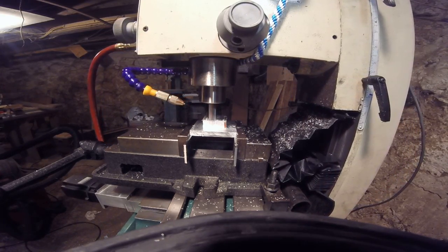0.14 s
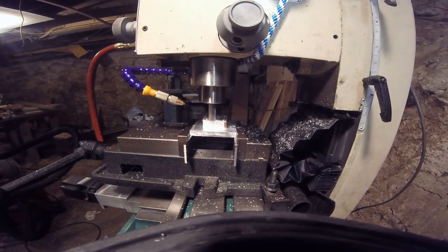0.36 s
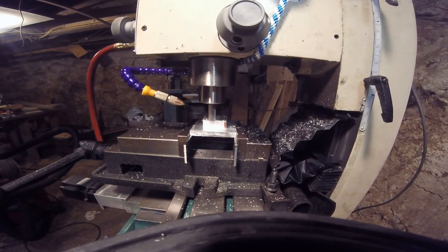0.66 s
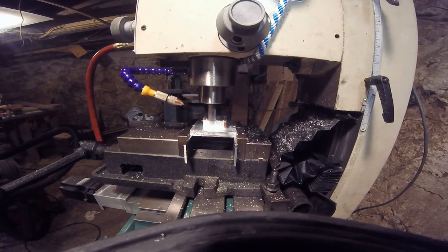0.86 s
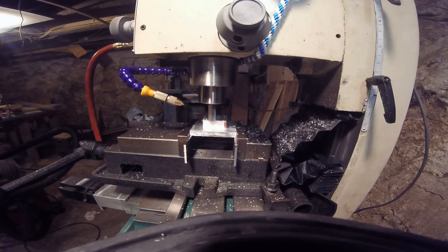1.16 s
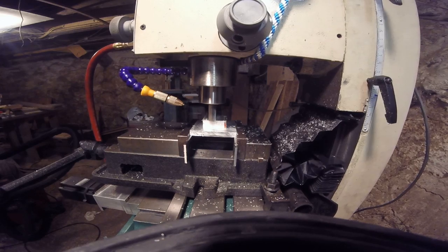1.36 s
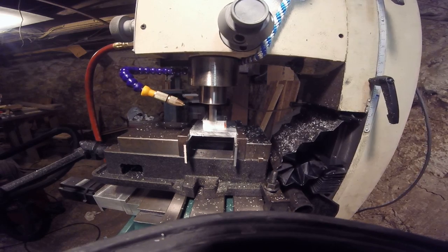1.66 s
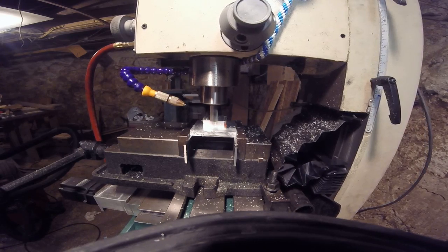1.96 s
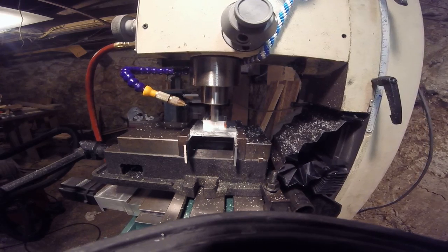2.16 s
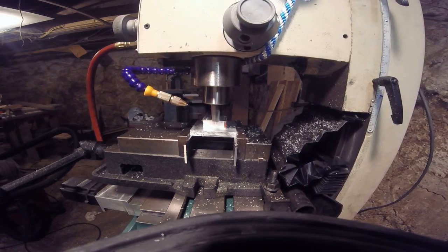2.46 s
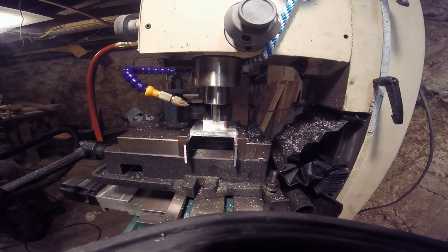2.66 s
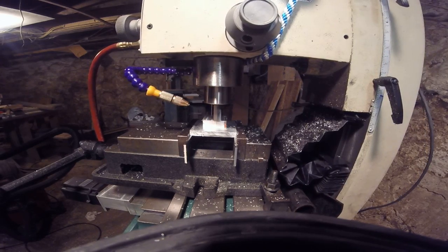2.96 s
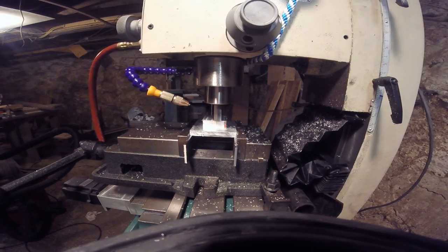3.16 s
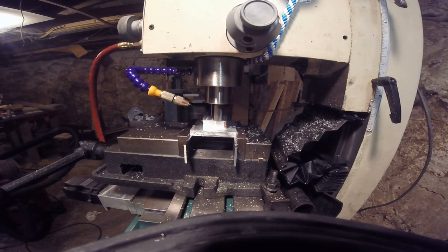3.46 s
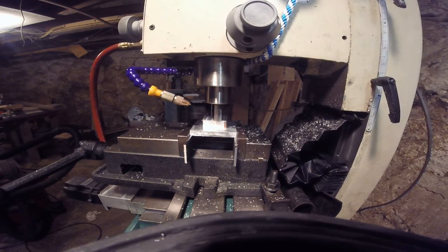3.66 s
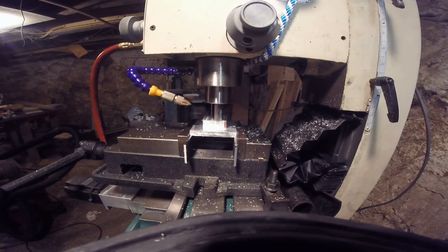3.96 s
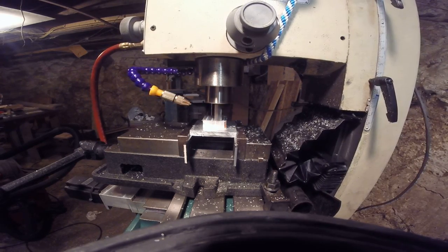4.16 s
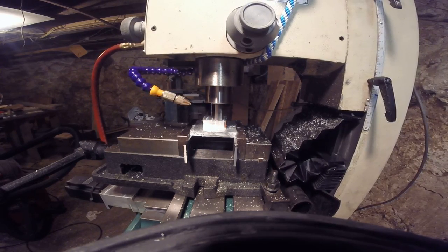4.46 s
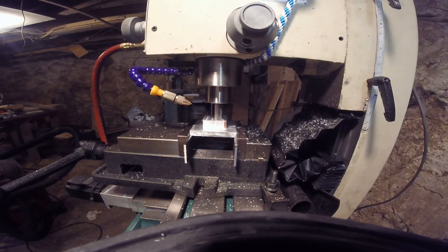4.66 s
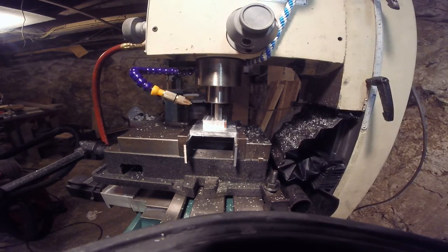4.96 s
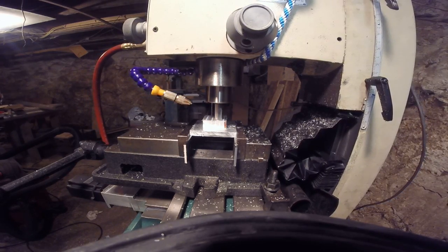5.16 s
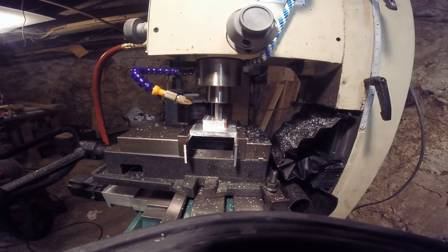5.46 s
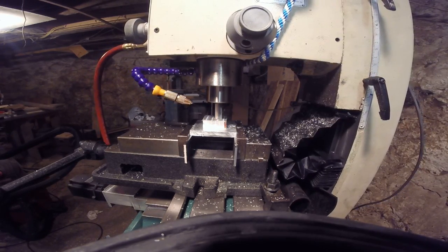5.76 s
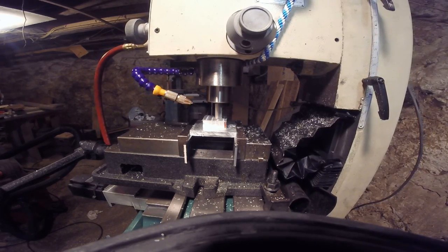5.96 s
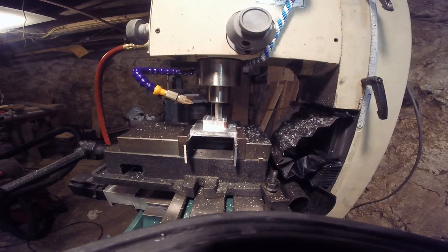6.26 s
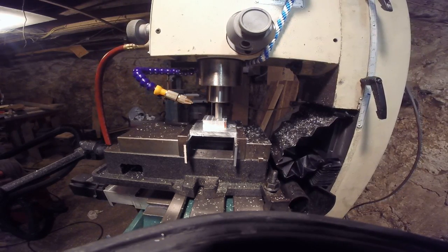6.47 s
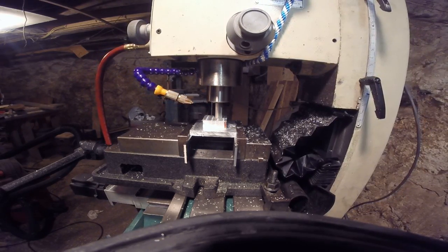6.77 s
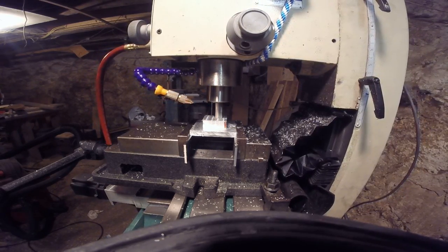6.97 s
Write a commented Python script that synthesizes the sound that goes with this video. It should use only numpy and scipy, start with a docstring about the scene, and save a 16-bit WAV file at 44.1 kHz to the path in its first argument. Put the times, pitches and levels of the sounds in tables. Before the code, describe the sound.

A small milling machine hums and hisses steadily as its cutter leaves the metal, the feed note sinks and rises, then cutting resumes.

```python
"""A small milling machine cuts metal, heard from a microphone near its table. Belt-driven spindle orders, motor knocks,
rumble and the air-jet hiss in ringing sheet-metal guards run throughout. The four-flute end mill leaves the block by
0.8 s; from 1 s the feed motors swing the table round a half circle, their note gliding to a halt at 2.3 s and back,
with jolts at its start, reversal and end. The cutter bites again from 2.5 s, at nearly full depth by 3.3 s.
Sources: sines locked to rotation, impulses through resonances, and coloured noise."""
import sys
import numpy as np
from scipy import signal
from scipy.fft import rfft, irfft, next_fast_len
from scipy.io import wavfile
from scipy.ndimage import uniform_filter1d, map_coordinates

SR = 44100
rng = np.random.default_rng(int(sys.argv[2]) if len(sys.argv) > 2 else 0)


def amplitude_ratio(level_db):
    """Convert a level in decibels to the matching linear amplitude (field) ratio."""
    exponent = np.asarray(level_db, float) / 20
    return 10 ** exponent


def pcm_store(signal):
    """Save signal as 16-bit PCM."""
    levels = np.round(np.clip(np.atleast_2d(signal), -1, 1) * 32767)
    wavfile.write(sys.argv[1], SR, levels.astype(np.int16).T)


N = 313992
BELT_RATIO = 1.79  # motor turns per spindle turn

# Spindle load. Each row: time in seconds, unbalance level in dB, depth of cut in dB re a full cut.
SPINDLE_LOAD = [(0, -28, 2), (.3, -24, 1), (.6, -24, -4), (.8, -27, -28), (1, -28.5, -36),
                (1.5, -30.5, -42), (2, -31.5, -49), (2.45, -32, -28), (2.65, -31, -16), (2.95, -31.5, -10),
                (3.15, -30.5, -2.5), (3.3, -31, -1), (3.6, -31, 0), (3.85, -25.5, 0), (5, -27.5, 0.5),
                (6, -25, -.5), (7.12, -26.5, -0.4)]
# Spindle speed. Each row: time in seconds, turns per second.
SPINDLE_SPEED = [(0, 34.35), (.5, 34.2), (1.5, 33.74), (2, 33.7), (3, 33.4), (4.25, 33.83), (5, 33.95),
                 (7.12, 34.09)]
# Head travel. Each row: time in seconds, share of the second side (0 to 1).
HEAD_TRAVEL = [(0, 0.054), (1.5, 0.23), (2.5, 0.29), (4, 0.27), (5.5, 0.87), (7.12, 1)]
# Half circle of the table: middle in seconds, half length in seconds.
HALF_CIRCLE = (2.28, 1.24)
# Frame and table resonances. Each row: centre in Hz, width in Hz, gain in dB.
FRAME_MODES = [(70.4, 12, 10), (93.2, 28.5, 12.5), (130, 22, 4.5), (167.5, 18, 9.5), (381.7, 22.5, 5.5)]


def unit(x):
    """Scaled to rms 1."""
    return x / np.sqrt(np.mean(x ** 2) + 1e-20)


def seconds():
    """Time of each sample."""
    return np.arange(N) / SR


def curves(rows):
    """One value per sample for each column after the time."""
    s, *cols = np.transpose(rows)
    return [np.interp(seconds(), s, c) for c in cols]


def wobble(rate_hz):
    """Smooth random curve, rate_hz knots a second."""
    knots = rng.standard_normal(int(N * rate_hz / SR) + 4)
    return map_coordinates(knots, [np.arange(N) * rate_hz / SR])


def filtered(x, response):
    """x times a response of frequency."""
    m = next_fast_len(N + SR // 2)
    return irfft(rfft(x, m) * response(np.fft.rfftfreq(m, 1 / SR)), m)[:N]


def resonance(f, hz, width_hz):
    """Causal band-pass response, 1 at its centre."""
    return 1j * f * width_hz / (hz * hz - f * f + 1j * f * width_hz)


def noise(response, patchy_db):
    """Noise of rms 1 with time-frequency patches of random gain, coloured by a response."""
    z = signal.stft(rng.standard_normal(N + 512), nperseg=512)[2]
    field = uniform_filter1d(rng.standard_normal(z.shape), size=5, axis=0)
    field = uniform_filter1d(field, size=10, axis=1)
    patchy = signal.istft(z * amplitude_ratio(patchy_db * unit(field)), nperseg=512)[1][:N]
    return unit(filtered(patchy, response))


def along(rows, f):
    """Gain of (Hz, dB) points on a log axis, silent beyond the ends."""
    hz, db = np.transpose(rows)
    return amplitude_ratio(np.interp(np.log(f + 1), np.log(hz + 1), db, -120, -120))


def angle(rate_hz):
    """Running phase of a rotation, in radians."""
    return 2 * np.pi * np.cumsum(rate_hz) / SR


def knocks(turns, uneven_db):
    """One impulse a turn, placed between samples, of uneven size."""
    at = np.interp(np.arange(1, int(turns[-1])), turns, np.arange(N))
    size = amplitude_ratio(uneven_db * rng.standard_normal(len(at)))
    whole = at.astype(int)
    early = np.bincount(whole, size * (1 + whole - at), N)
    late = np.bincount(whole + 1, size * (at - whole), N + 1)
    return early[:N] + late[:N]


def plateau(start_s, length_s, blend_s):
    """1 from start_s for length_s, 0 elsewhere, with soft edges."""
    t = seconds()
    rise = np.clip((t - start_s) / blend_s + .5, 0, 1)
    return rise * np.clip((start_s + length_s - t) / blend_s + .5, 0, 1)


def by_leg(values):
    """One value for each leg of the table's travel: out, slowing, speeding up, back."""
    middle_s, half_s = HALF_CIRCLE
    steps = [plateau(s, N, blend_s=0.26) for s in (middle_s - half_s, middle_s, middle_s + half_s)]
    return values[0] + sum(change * step for change, step in zip(np.diff(values), steps))


def swing():
    """Angle on the half circle, -pi/2 to pi/2 radians, held at the ends."""
    middle_s, half_s = HALF_CIRCLE
    return np.clip((seconds() - middle_s) / half_s, -1, 1) * np.pi / 2


def spindle():
    """Unbalance and run-out give the low orders; each flute strike adds overtones of the tooth rate."""
    # Orders 2, 3 and 4 (tooth strike). Each row: level in dB in a full cut, dB per dB of cut, waver in dB.
    orders_cut = [(-34.5, 0.25, 0), (-40.5, 0.8, -2), (-33.5, 1.7, -1)]
    # Lag of orders 1-4 behind the unbalance, in radians.
    order_lags = [0, -1.7, -1.0, -1.6]
    # Fainter note beating with the unbalance: Hz below it, time of one crest in seconds, level in dB.
    beat_note = (1.09, 3.3, -45)
    # Overtones. Each row: multiple of the tooth rate, level in dB re the tooth strike.
    tooth_overtones = [(2, -13), (3, -16), (4, -22), (5, -30), (6, -32), (8, -16), (9, -24), (10, -15)]
    flutes = 4
    unbalance_db, cut_db = curves(SPINDLE_LOAD)
    turn = angle(curves(SPINDLE_SPEED)[0])
    levels_db = [unbalance_db + .4 * wobble(6)]
    levels_db += [db + gain * cut_db + waver_db * wobble(3.59) for db, gain, waver_db in orders_cut]
    out = sum(amplitude_ratio(db) * np.cos(order * turn + lag)
              for order, (db, lag) in enumerate(zip(levels_db, order_lags), start=1))
    below_hz, crest_s, beat_db = beat_note
    out = out + amplitude_ratio(beat_db) * np.cos(turn - 2 * np.pi * below_hz * (seconds() - crest_s))
    second_side = np.clip(curves(HEAD_TRAVEL)[0], 0, 1)
    # chips load the flutes unevenly: overtones waver in size and phase
    for k, db in tooth_overtones:
        near = second_side if k > 7 else 1  # the top ones carry only from the second side
        level = near * amplitude_ratio(levels_db[3] + db + 2 * wobble(5))
        out = out + level * np.cos(k * flutes * turn + .1 * k * wobble(4))
    return np.sqrt(2) * out  # levels are rms


def vice_knock():
    """The longest flute knocks the vice once a turn and rings its modes."""
    # Level in dB on the way out, slowing, speeding up, on the way back.
    knock_db = (-56, -54, -52, -69)
    # Modes. Each row: centre in Hz, width in Hz, gain in dB.
    vice_modes = [(306.5, 32, -3), (373.3, 61, 2), (548, 43, -14)]
    # Swell: start in seconds, length in seconds, gain in dB.
    vice_swell = (2.19, 0.9, 6.7)

    def vice(f):
        return sum((-1) ** k * amplitude_ratio(db) * resonance(f, hz, width) ** 2
                   for k, (hz, width, db) in enumerate(vice_modes))

    turns = angle(curves(SPINDLE_SPEED)[0]) / (2 * np.pi)
    knock = unit(filtered(knocks(turns, uneven_db=3.5), vice))
    start_s, length_s, swell_db = vice_swell
    swell = swell_db * plateau(start_s, length_s, blend_s=.15)
    return amplitude_ratio(by_leg(knock_db) + swell + .7 * wobble(3.76)) * knock


def motor():
    """One knock a turn, with a scrape of brush noise after it, rings the modes of the housing."""
    # Each row, one per mode: level in dB on the way out, slowing, speeding up, on the way back.
    mode_levels = [(-49.5, -53.5, -49, -49), (-50.5, -45, -42.5, -45), (-59, -42.5, -42.5, -51),
                   (-48, -57, -66, -53)]
    # Each row: centre in Hz, width in Hz.
    housing_modes = [(1082, 45), (1240, 150), (1338, 130), (1560, 220)]
    # Swells of the three lowest modes. Each row: start in seconds, length in seconds, gain in dB.
    mode_swells = [(2.4, 0.23, 7.5), (2.36, 0.51, 4), (1.11, 0.67, 4.5)]
    turns = np.cumsum(curves(SPINDLE_SPEED)[0] * BELT_RATIO) / SR
    scrape = np.exp(-(turns % 1) / 0.26) * rng.standard_normal(N)
    strike = unit(knocks(turns, uneven_db=2.5)) + .3 * unit(scrape)
    swells_db = [db * plateau(s, length, blend_s=.06) for s, length, db in mode_swells] + [0]
    out = np.zeros(N)
    for legs_db, swell_db, (hz, width) in zip(mode_levels, swells_db, housing_modes):
        ringing = unit(filtered(strike, lambda f: resonance(f, hz, width) ** 2))
        out += amplitude_ratio(by_leg(legs_db) + swell_db + wobble(4.74)) * ringing
    return out


def feed_motor():
    """The long axis slows, stops and reverses on the half circle; its motor note follows the speed."""
    # Each row: multiple of the note, level in dB ahead of the frame gain and the fade at low speed.
    step_overtones = [(1, -47), (2, -47), (3, -57), (4, -67)]
    full_feed_hz = 125.8
    speed = np.abs(np.sin(swing()))
    out = np.zeros(N)
    for k, db in step_overtones:
        hz = k * full_feed_hz * speed
        # an overtone swells as it passes a frame resonance, and fades as the motor halts
        gain = 1 + sum(amplitude_ratio(g) * np.abs(resonance(hz + 1e-3, c, w)) ** 2 for c, w, g in FRAME_MODES)
        fade = hz / (hz + 40)
        out += np.sqrt(2) * amplitude_ratio(db + 1.24 * wobble(14)) * gain * fade * np.sin(angle(hz))
    return out


def table_hum():
    """Narrow noise bands that die away near the halt, and a whine while the table runs straight."""
    # Each row: centre in Hz, width in Hz, level in dB running straight, level in dB on the half circle.
    hum_bands = [(70.93, 2, -42.5, -63), (94.5, 4.5, -43.5, -40), (130.6, 1.9, -49.5, -57),
                 (183.8, 4, -51, -58), (438.4, 14, -49.5, -62)]
    # Whine: pitch in Hz, level in dB.
    straight_whine = (450.4, -50)
    arc = swing()
    straight = uniform_filter1d(1.0 * (np.abs(arc) >= np.pi / 2), size=SR // 10)
    hums = np.zeros(N)
    for hz, width, straight_db, arc_db in hum_bands:
        band = unit(filtered(rng.standard_normal(N), lambda f: resonance(f, hz, width) ** 2))
        hums += amplitude_ratio(arc_db + (straight_db - arc_db) * straight) * band
    moving = np.clip(np.abs(np.sin(arc)) / 0.34, 0, 1) ** 2  # falls below 0.34 of full feed
    whine_hz, whine_db = straight_whine
    whine = np.sin(2 * np.pi * whine_hz * seconds() + 0.56 * wobble(12))
    whine *= np.sqrt(2) * amplitude_ratio(whine_db + 2.3 * wobble(14))
    return moving * hums + straight * whine


def jolts():
    """Noise bursts shake the frame modes as the half circle begins, reverses and ends."""
    # Each row: time in seconds, relative level in dB, half length in seconds (to 1/e).
    table_jolts = [(1.07, -28.5, 0.067), (2.274, -41, 0.054), (3.507, -31, 0.064)]
    push = sum(amplitude_ratio(db) * np.exp(-((seconds() - s) / half_s) ** 2) for s, db, half_s in table_jolts)

    def frame(f):
        return sum(amplitude_ratio(g) * resonance(f, c, w) ** 2 for c, w, g in FRAME_MODES)

    return 3 * filtered(push * rng.standard_normal(N), frame)


def table_ring():
    """The table sings briefly: one sine under a flat-topped envelope."""
    # Middle in seconds, half length in seconds (to 1/e), pitch in Hz, level in dB.
    brief_note = (3, 0.45, 377.5, -43)
    t = seconds()
    middle_s, half_s, hz, db = brief_note
    return np.sqrt(2) * amplitude_ratio(db) * np.exp(-((t - middle_s) / half_s) ** 4) * np.sin(2 * np.pi * hz * t)


def rumble():
    """Broad shaking of frame and table and the drive's whir: coloured noise, partly raised by the cut."""
    # Frame, table, drive. Each row: level in dB out, slowing, speeding up, back; dB gained in a full cut.
    shake_levels = [(-45, -43.5, -46, -46.5, 4.5), (-43, -47, -48.5, -44, 1.5),
                    (-46.5, -49.5, -47.5, -49.5, 0)]
    # Colours of frame, table and drive. Each row: Hz, relative level in dB per Hz.
    frame_colour = [(20, -30), (30, -30), (47, -3), (62, -4), (82, -1), (100, 2.5), (130, -17), (155, -6.5),
                    (185, -10.5), (215, -16.5), (240, -45)]
    table_colour = [(200, -28), (220, -14), (245, -6), (285, -12), (305, -4), (325, -13.5), (350, -7),
                    (375, -0.5), (415, -4), (445, -9), (465, -7), (500, -48)]
    drive_colour = [(440, -42), (470, -3), (520, -1.5), (545, 0.5), (600, -1.5), (640, -14.5), (750, -17),
                    (900, -18), (1000, -15.5), (1100, -15)]
    cut = amplitude_ratio(curves(SPINDLE_LOAD)[1])
    layers = [(frame_colour, .5), (table_colour, 1.0), (drive_colour, 1.0)]
    out = np.zeros(N)
    for (*legs_db, bite_db), (colour, patchy_db) in zip(shake_levels, layers):
        level_db = by_leg(legs_db) + bite_db * cut + .6 * wobble(1.34)
        out += amplitude_ratio(level_db) * noise(lambda f: along(colour, f), patchy_db)
    return out


def mains_hum():
    """Steady sine of the drive's mains supply."""
    # Each row: pitch in Hz, level in dB.
    mains_notes = [(120, -47)]
    return sum(np.sqrt(2) * amplitude_ratio(db) * np.sin(2 * np.pi * hz * seconds()) for hz, db in mains_notes)


def hiss():
    """Air jet and chip spray ring the guards; the colour drifts as the head travels."""
    # Each row: centre in Hz, width in Hz, gain in dB at the first side, gain in dB at the second side.
    guard_modes = [(1097, 162, -3, 0), (1330, 314, -2.5, -2.5), (1555, 174, -0.5, 0.5), (1870, 48, -13, -2),
                   (2148, 254, -5, -1.5), (2554, 630, -8, -5), (2968, 123, -4.5, -2.5),
                   (3197, 190, -4.5, -4.5), (3858, 475, -9.5, -7.5), (4395, 84, -14.5, -13),
                   (4838, 460, -15.5, -14), (5650, 210, -21, -15.5), (6312, 470, -11, -8),
                   (7810, 690, -15, -13.5), (8690, 490, -23, -14.5), (9200, 280, -28, -19),
                   (10520, 660, -21, -20), (11670, 430, -29, -27), (12750, 400, -28, -35),
                   (13700, 450, -39, -25), (14850, 400, -35, -27.5)]
    # Hiss between the modes. Each row: Hz, gain in dB.
    between_modes = [(900, -33), (1800, -27), (3500, -17), (5300, -26.5), (7100, -23.5), (10000, -25),
                     (11200, -35.5), (15300, -36)]

    def guards(column):
        def response(f):
            edge = 1 / (1 + (1000 / (f + 1)) ** 12)  # little hiss reaches the microphone below 1 kHz
            modes = sum(np.abs(amplitude_ratio(row[column]) * resonance(f, row[0], row[1]) ** 2) ** 2
                        for row in guard_modes)
            return np.sqrt(along(between_modes, f) ** 2 + edge ** 2 * modes)
        return response

    share = np.clip(curves(HEAD_TRAVEL)[0], 0, 1)
    first = amplitude_ratio(-35.0) * noise(guards(column=2), patchy_db=1.0)
    second = amplitude_ratio(-35.5) * noise(guards(column=3), patchy_db=-1.0)
    blend = np.sqrt(1 - share) * first + np.sqrt(share) * second
    throb = 1 + 0.035 * np.cos(angle(curves(SPINDLE_SPEED)[0] * BELT_RATIO))  # faint, once a motor turn
    return amplitude_ratio(0.27 * wobble(6.3)) * throb * blend


def chip_ticks():
    """Small chips tick against the sheet metal: random impulses through a broad high resonance."""
    chips = (rng.random(N) < 150 / SR) * amplitude_ratio(3 * rng.standard_normal(N))  # about 150 a second
    return amplitude_ratio(-71) * unit(filtered(chips, lambda f: resonance(f, 12500, 5000) ** 2))


def scene():
    """Everything reaches one microphone."""
    machine = spindle() + vice_knock() + motor() + rumble() + mains_hum()
    table = feed_motor() + table_hum() + jolts() + table_ring()
    return (machine + table + hiss() + chip_ticks())[None]


def roll_off(x):
    """The treble ends steeply here."""
    return signal.sosfilt(signal.butter(12, 15210, fs=SR, output="sos"), x)


def record(dry):
    """The finished mix as the camera stores it."""
    return roll_off(dry)


dry = scene()
out = record(dry)
pcm_store(out)
```